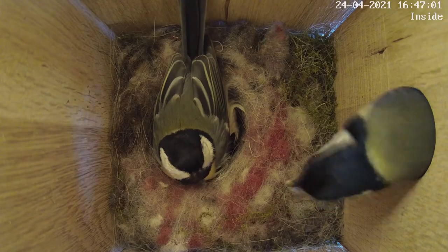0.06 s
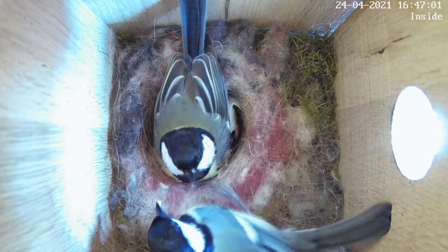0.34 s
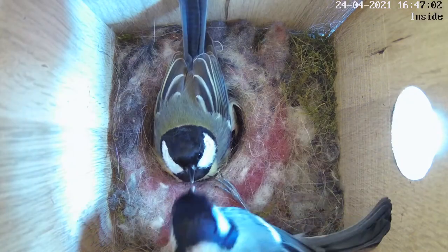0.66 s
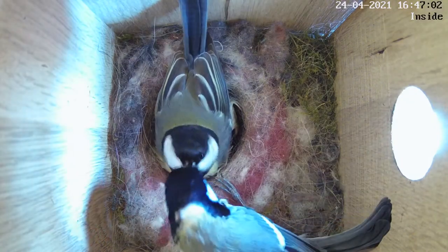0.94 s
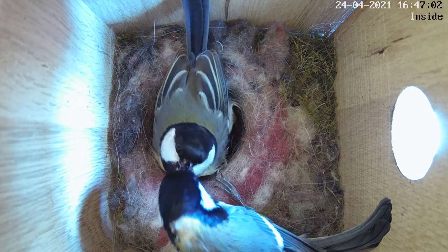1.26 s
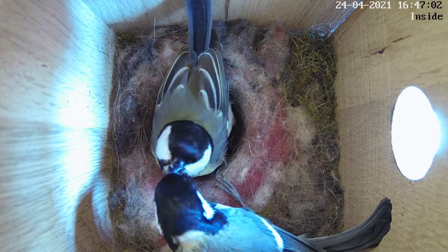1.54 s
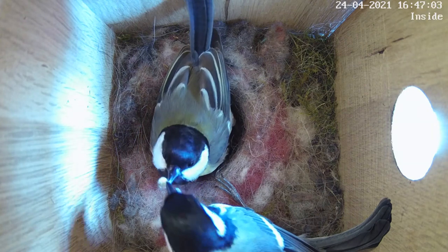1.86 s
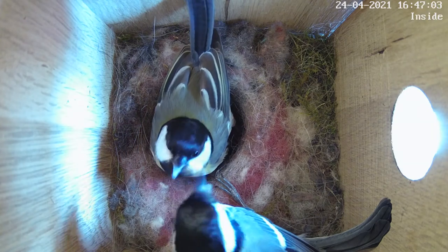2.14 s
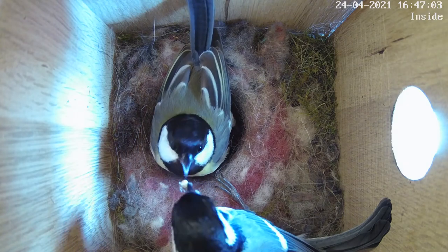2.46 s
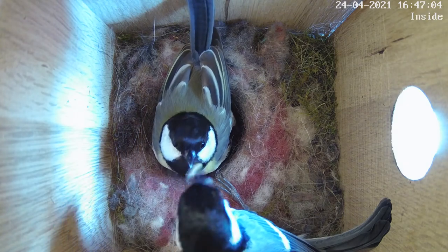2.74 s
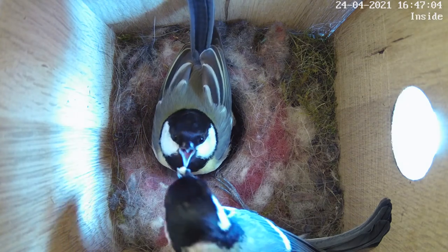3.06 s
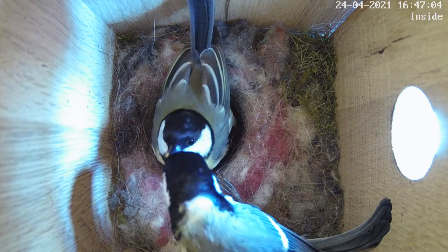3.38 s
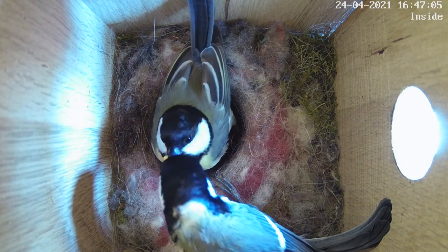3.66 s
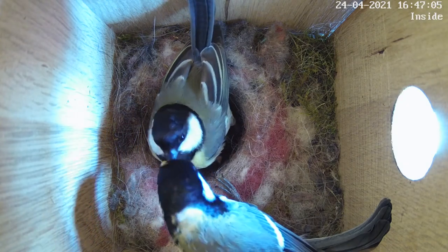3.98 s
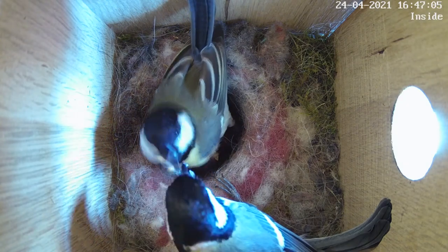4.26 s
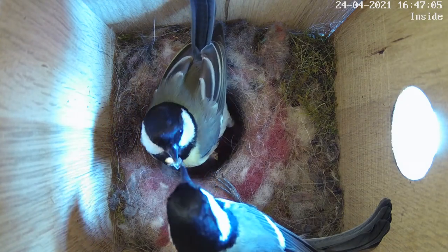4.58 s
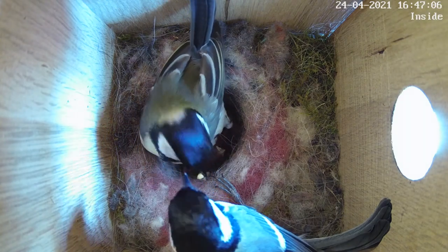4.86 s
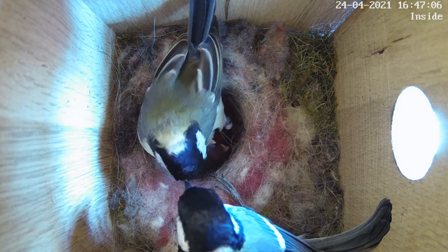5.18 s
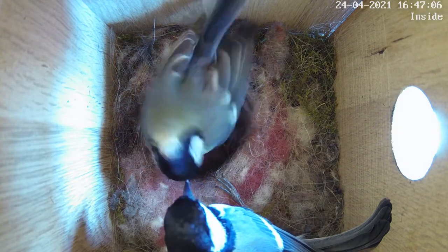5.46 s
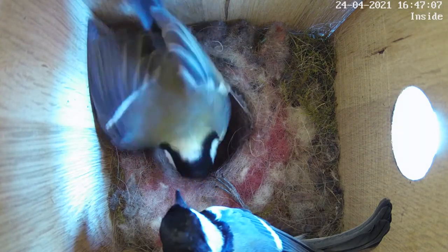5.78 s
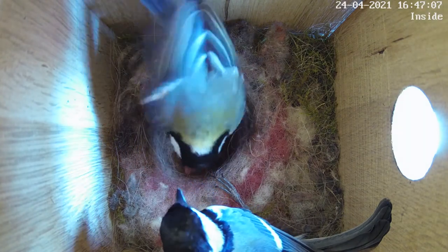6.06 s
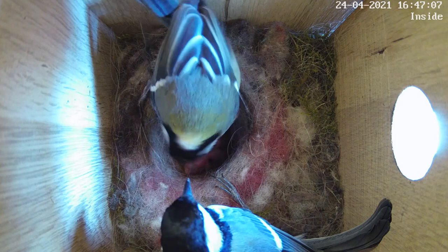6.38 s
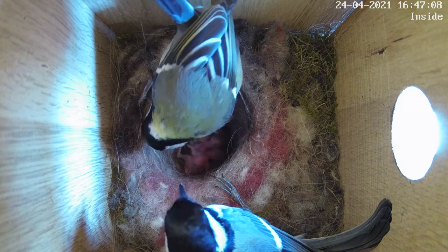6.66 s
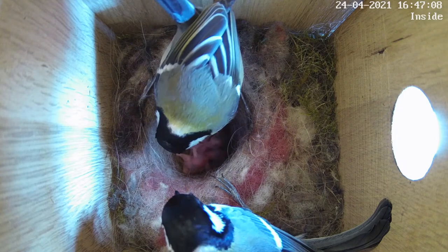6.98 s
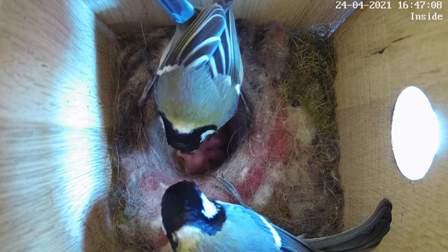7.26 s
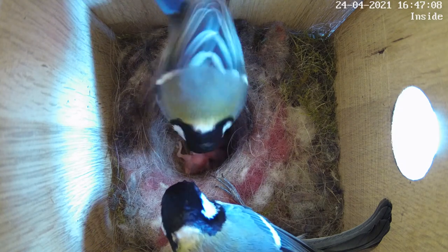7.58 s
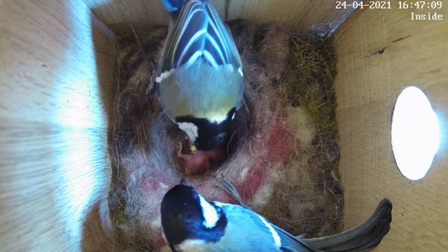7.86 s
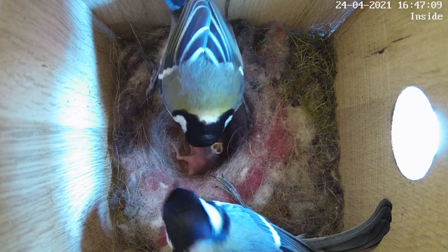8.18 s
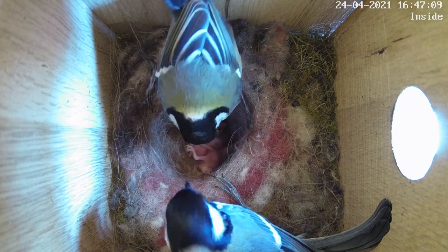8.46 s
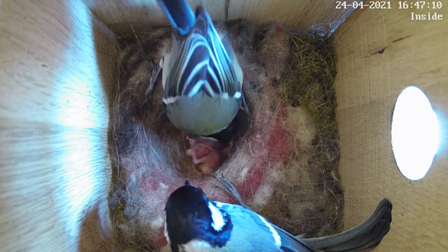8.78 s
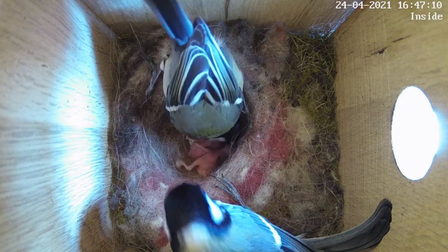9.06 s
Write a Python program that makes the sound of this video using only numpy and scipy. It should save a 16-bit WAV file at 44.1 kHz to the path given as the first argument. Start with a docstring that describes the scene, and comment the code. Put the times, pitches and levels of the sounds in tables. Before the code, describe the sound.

A small microphone is close to two small birds inside a wooden nest box, over a steady low rumble. In the first 0.3 seconds, wings and feet knock hollowly on the walls and the nest rustles. From the start until about 3.3 seconds, one bird gives seven loud, hoarse rasping calls, the later ones surging brighter and the last cracking. Songbirds whistle outside from about 1.2 to 2.7 seconds. Between 3.3 and 5.3 seconds it is quieter, with tiny beak snaps, a faint hatchling peep at 4 seconds and growing rustles of moss and feathers. Sharp double notes come at about 5.6, 6.5 and 7.9 seconds, with a wing thump and a crisp rustle at 5.8. A few more light clicks and shuffles follow. From 7.3 seconds to the end, just past 9, the distant songbirds whistle again with a slight echo, and hatchlings peep thinly near 8.1 and 8.8.

```python
"""Inside a wooden nest box, a small microphone close to two great tits.
One gives long rasping calls, rough syrinx pulses ringing its throat and the box, and later three sharp
double notes. Wings and feet knock the walls, the nest rustles, beaks snap and hatchlings peep faintly.
Farther off, songbirds whistle outside, scattered by trees and walls, over a steady low rumble."""
import sys
import numpy as np
from scipy import signal
from scipy.io import wavfile
from scipy.ndimage import uniform_filter1d

SR = 44100
rng = np.random.default_rng(int(sys.argv[2]) if len(sys.argv) > 2 else 0)


def to_wav(s):
    """Save 16-bit WAV."""
    ch = np.atleast_2d(s).T  # columns
    pcm = np.round(np.clip(ch, -1, 1) * 32767)  # PCM
    wavfile.write(sys.argv[1], SR, pcm.astype(np.int16))


N = 402191
T = np.arange(N) / SR


def amp(db):
    """Decibels to gain."""
    return 10 ** (np.asarray(db) / 20)


def unit_rms(x):
    """Scales to rms 1."""
    return x / np.sqrt(np.mean(x ** 2) + 1e-20)


def add(mix, start, sound):
    """Mixes a sound in at a time in seconds."""
    part = mix[max(round(start * SR), 0):][:len(sound)]
    part += sound[:len(part)]


def wander(count, hz):
    """A random drift of rms 1 that turns hz times a second."""
    knots = rng.standard_normal(N // 8)
    return unit_rms(np.interp(np.arange(count) * hz / SR, np.arange(len(knots)), knots))


def bump(t, centre, half_width):
    """A smooth swell of height 1."""
    return np.exp(-((t - centre) / half_width) ** 2)


def below(x, hz, order):
    """The part of a sound under a frequency."""
    return signal.sosfiltfilt(signal.butter(order, hz, fs=SR, output="sos"), x)


def colour(x, spectrum, peaks=()):
    """Minimum-phase filter made of a broad spectrum plus resonance peaks."""
    bins = np.fft.rfftfreq(4096, 1 / SR)
    corners, db = np.transpose(spectrum)
    power = amp(np.interp(np.log(bins + 1), np.log(corners), db)) ** 2
    for hz, width, peak_db in peaks:
        power += (amp(peak_db) / (1 + ((bins - hz) / (width * .44)) ** 2)) ** 2
    log_gain = np.log(np.r_[power, power[-2:0:-1]]) / 2
    taps = np.fft.ifft(np.exp(np.conj(signal.hilbert(log_gain)))).real
    return signal.oaconvolve(x, taps)[:len(x)]


# The outdoors, heard through the walls: (frequency [Hz], relative level [dB])
RUMBLE_SPECTRUM = [(25, -22.5), (60, -19.5), (85, -19.5), (105, -14), (130, -2.5), (185, 2.5), (240, -1),
                   (310, -11), (450, -22), (600, -24.5), (1100, -24.5), (2500, -37.5), (6000, -47),
                   (15000, -59.5)]
# Its resonances in the box: (frequency [Hz], width [Hz], relative level [dB])
RUMBLE_PEAKS = [(713, 144, -13), (1458, 170, -15.5), (2060, 200, -36), (2930, 590, -32), (10800, 120, -45)]
def rumble(level_db=-44.5, swell_db=.74):
    """A steady low bed of noise, hollow with the box's resonances."""
    gain = amp(level_db + swell_db * wander(N, 5.6))
    return gain * unit_rms(colour(rng.standard_normal(N), RUMBLE_SPECTRUM, RUMBLE_PEAKS))


# Surges within the rasps: (time [s], half width [s], push [dB], hiss rise [dB], clearing [0-1])
EFFORT_SURGES = [(.01, .018, 4.5, 8, 0), (.362, .018, 9, 3.5, .9), (.452, 0.019, 7, 0, .5),
                 (0.502, 0.043, 4, 3.5, 0.14), (0.767, 0.015, 5, 0.5, 0.15), (1.455, 0.019, 7.5, -3.5, 0),
                 (2.217, .03, 7, 12.5, 0.02), (2.343, .025, 12.5, 16, .6), (2.505, .027, 13.5, 16.5, 0.62),
                 (2.641, .026, 15.5, 18.5, 0.7), (2.903, 0.018, 3.5, 0, 0.02), (3.011, .048, 5, 5, 0.61),
                 (3.145, 0.077, 5.5, 12, .8)]
def effort(t, beak_lag=1.6):
    """Surges push the voice and clear its tone; the beak gapes more slowly and lifts the hiss."""
    push_db = sum(db * bump(t, at, width) for at, width, db, _, _ in EFFORT_SURGES)
    gape_db = sum(db * bump(t, at, width * beak_lag) for at, width, _, db, _ in EFFORT_SURGES)
    clearing = sum(share * bump(t, at, width) for at, width, _, _, share in EFFORT_SURGES)
    return push_db, gape_db, clearing


def pulses(cycles, harmonics):
    """One sharp pulse a cycle, as a sum of harmonics."""
    return unit_rms(np.cos(2 * np.pi * np.outer(cycles, np.arange(1, harmonics + 1))).sum(1))


def syrinx(hz, rough):
    """Pulses and puffs of breath; roughness makes their timing and strength chaotic."""
    count = len(hz)
    jitter = .24 * rough ** 2 * wander(count, 600) + .016 * wander(count, 500)
    cycles = np.cumsum(hz * (1 + jitter)) / SR
    shimmer = np.exp((.12 + .25 * rough) * np.clip(wander(count, 400), -1.6, 1.6))
    tone = pulses(cycles, harmonics=24) * shimmer
    tone = signal.sosfilt(signal.butter(1, 1000, "high", fs=SR, output="sos"), tone)  # weak low harmonics
    breath = unit_rms((.4 + np.exp(-(cycles % 1) / .45)) * rng.standard_normal(count))
    return np.sqrt(1 - .75 * rough ** 2) * tone + (.1 + .75 * rough) * breath


# Resonances of throat and box: (frequency [Hz], width [Hz], relative level [dB])
THROAT_PEAKS = [(707.3, 190, 4.5), (1317.5, 123, 1), (1526, 170, 1.5), (1810, 210, -5), (1977, 190, 1),
                (2320, 67, -8.5), (2744, 180, 4.5), (3212, 760, -4.5), (3880, 440, -12.5),
                (4850, 1100, -22.5), (6190, 860, -29), (7660, 1500, -35.5)]
# The broad skirt under them: (frequency [Hz], relative level [dB])
THROAT_SKIRT = [(100, -50.5), (300, -22), (500, -11), (780, -26), (1000, -24.5), (3500, -29), (4400, -35),
                (9000, -44), (10500, -59.5), (13500, -57), (15500, -59.5)]
# The last rasp cracks into hoarse pulses: (time [s])
VOICE_CRACKS = [2.92, 2.974, 3.058, 3.119, 3.205]
# Rasps close to the microphone, before effort acts: (time [s], length [s], attack [s], low band [dB], # throat
# band [dB re low], hiss [dB re low], pitch [Hz], roughness [0-1], beak notch [Hz], lowest resonance [dB])
RASP_CALLS = [(0.0, 0.16, 0.0013, -28.5, -1.5, -20.5, 485, 0.91, 4700, -1.5),
              (.3, 0.532, 0.016, -29.5, -.5, -18, 494.1, .82, 4680, 0.5),
              (.939, 0.22, 0.013, -31, -3, -17.5, 479.7, 0.72, 4660, -1.5),
              (1.294, .183, 0.03, -31, -2.5, -14, 488.4, 0.78, 4240, -1.5),
              (1.752, 0.357, 0.027, -28, -6, -17.5, 455.4, .76, 4020, -1),
              (2.172, 0.51, 0.02, -29, -2.9, -26.5, 475.4, 1.03, 4230, 1),
              (2.879, 0.4, .013, -30, 1, -19.5, 440.9, .55, 4370, -0.5)]
def rasp(start, length, attack, level_db, throat_db, hiss_db, pitch_hz, roughness, notch_hz, chest_db,
         hz_per_db=6, leap_hz=20.78, leap_s=.024, gape_s=.02, shut_db=-4.5, release_s=.024):
    """The syrinx rings the throat and the box; effort makes the call higher, clearer and louder."""
    t = start + np.arange(0, length, 1 / SR)
    push_db, gape_db, clearing = effort(t)
    cracks = sum(bump(t, at, half_width=.011) for at in VOICE_CRACKS)
    leaps = sum(bump(t, at + leap_s, leap_s) for at in VOICE_CRACKS)  # the pitch leaps after a crack
    hz = pitch_hz + hz_per_db * push_db + leap_hz * leaps
    rough = np.clip(roughness * (1 - clearing) + .66 * cracks, 0, 1)
    voice = colour(syrinx(hz, rough), THROAT_SKIRT, THROAT_PEAKS)
    notched = signal.lfilter(*signal.iirnotch(notch_hz, Q=4.1, fs=SR), voice)
    voice += .82 * (notched - voice)  # the beak's anti-resonance
    voice += (amp(chest_db + 2.5 * cracks) - 1) * below(voice, 1013, order=6)  # the lowest resonance
    low = below(voice, 2450, order=8)
    under_notch = below(voice, notch_hz, order=8)
    hiss = voice - under_notch
    throat = under_notch - low
    throat += (amp(.45 * push_db) - 1) * below(throat, 3050, order=8)  # surges favour its main resonance
    shut = np.maximum(1 - np.minimum(t - start, t[-1] - t) / gape_s, 0)  # the beak opens and closes
    # Each band is levelled, then set: more effort and a wider beak move the power upwards.
    bands = ((low, .09 * push_db), (throat, throat_db + push_db),
             (hiss, hiss_db + gape_db + shut_db * shut))
    call = sum(amp(db) * band / np.sqrt(abs(uniform_filter1d(band ** 2, size=1200)) + 1e-12)
               for band, db in bands)
    envelope = np.clip(np.minimum((t - start) / attack, (t[-1] - t) / release_s), 0, 1)
    waver_db = .83 * wander(len(t), 33.8)
    return amp(level_db + waver_db) * call * envelope


# Modes of the wooden box: (frequency [Hz], relative level [dB], time to fall 60 dB [s])
BOX_MODES = [(153, -29, 0.18), (198, -5, 0.17), (293, 8.5, 0.016), (412, 15.5, 0.0087), (687, 9.5, 0.1),
             (830, 0, 0.12), (1510, -30, .035), (2000, -28, .025), (2800, -12, 0.0092)]
# Scraping of feathers, claws and nest: (frequency [Hz], relative level [dB])
SCRAPE_SPECTRUM = [(150, -19.5), (400, -3.5), (600, 0.5), (1100, -4.5), (1700, -2), (2450, -5.5),
                   (3000, -7), (4500, -19), (8000, -32.5), (15000, -38.5)]
# Wings and feet hit the walls around the microphone: (time [s], thud peak [dB], contact [s])
WALL_KNOCKS = [(.002, -16.5, 0.0072), (.027, -18.5, 0.0064), (0.061, -21.5, .0055), (0.124, -18, 0.0053),
               (.148, -18.5, 0.0047), (0.169, -13.5, .005), (0.194, -13.5, 0.0046), (0.209, -20, 0.0052),
               (.277, -29, 0.0014), (2.809, -31.5, 0.0014), (2.823, -34.5, 0.0009), (3.944, -40.5, .0014),
               (5.087, -36, 0.00095), (5.331, -39, 0.00096), (5.454, -30, 0.00085), (5.492, -33, 0.0011),
               (5.548, -37, .0012), (5.7511, -12, 0.0024), (5.781, -27, 0.0019), (5.81, -28, 0.0052),
               (5.822, -39, .0007), (6.038, -43.5, 0.0015)]
def knock(peak_db, contact, scrape_db=-19):
    """A soft push rings the box while feathers or claws scrape."""
    t = T[:SR // 5]
    ring = sum(amp(db - 60 * t / t60) * np.sin(2 * np.pi * hz * t) for hz, db, t60 in BOX_MODES)
    push = np.sin(np.linspace(0, 2 * np.pi, int(contact * SR) + 3))  # in, and back out
    thud = signal.oaconvolve(ring, push)[:len(t)]
    age = t / (.96 * contact)
    scrape = unit_rms(colour(rng.standard_normal(len(t)), SCRAPE_SPECTRUM)) * age * np.exp(1 - age)
    return amp(peak_db) * (thud / abs(thud).max() + amp(scrape_db) * scrape)


# The box rings under scratches: (frequency [Hz], width [Hz], relative level [dB])
WALL_PEAKS = [(694, 300, 9.5), (1320, 240, 0.5), (1990, 200, 4.5)]
# Shuffles in the nest, close by: (time of peak [s], half width [s], level [dB], crispness [0-1])
NEST_SHUFFLES = [(.18, 0.12, -42, 1), (3.38, .08, -55, 0.5), (4.86, 0.12, -49, 0.25),
                 (5.13, 0.11, -51.5, 0.22), (5.45, 0.099, -46.5, 0.67), (5.555, 0.026, -44.5, 0.72),
                 (5.787, 0.011, -24, .95), (5.83, 0.13, -50, .9), (6.1, 0.02, -45.5, 0.98),
                 (6.22, 0.12, -55, 0.5), (7.62, 0.2, -56, .9)]
def rustle(grains_per_s=700, spread_db=4.5, clump_db=3.5, fidget_db=-63):
    """Moss and hair crackle and feathers rub in short scratches, faintly even between shuffles."""
    grains = (rng.random(N) < grains_per_s / SR) * rng.choice([-1, 1], N)
    grains = grains * amp(spread_db * np.minimum(rng.exponential(1, N), 3))
    rub = .87 * rng.standard_normal(N)
    scratches = (unit_rms(grains) + rub) * amp(clump_db * np.clip(wander(N, 70), -2, 2))
    sound = unit_rms(colour(scratches, SCRAPE_SPECTRUM, WALL_PEAKS))
    soft = below(sound, 1000, order=4)  # feathers on wool; dry moss crackles above
    swells = [(amp(db) * bump(T, at, width), crisp) for at, width, db, crisp in NEST_SHUFFLES]
    soft_gain = np.sqrt(amp(fidget_db) ** 2 + sum(swell ** 2 for swell, _ in swells))
    crackle_gain = np.sqrt(amp(fidget_db) ** 2 + sum((swell * crisp) ** 2 for swell, crisp in swells))
    return soft * soft_gain + (sound - soft) * crackle_gain


# Colour of a snap: (frequency [Hz], relative level [dB])
SNAP_SPECTRUM = [(500, -39), (2200, -1), (2900, 18), (3900, 8), (4400, -2), (5300, -4), (8000, -17),
                 (15000, -29)]
# Beak snaps at close range: (time [s], peak before a 2 dB lift [dB])
BEAK_SNAPS = [(0.8632, -51), (1.1585, -58), (3.3604, -53), (3.4436, -48), (3.5717, -52), (4.4463, -46.5),
              (4.551, -44), (4.569, -47), (4.6204, -53), (4.6955, -40), (4.7574, -53), (4.839, -46.5),
              (4.9866, -49.5), (5.1307, -53.5), (5.3074, -47), (6.187, -51), (6.265, -57), (7.577, -50.5),
              (7.6296, -51)]
def beak_snap(db, decay_s=.0013, echo_s=.0053):
    """A beak snaps on food: a tiny crack with quick wall echoes."""
    t = T[:SR // 25]
    envelope = np.exp(-t / decay_s) + .36 * np.exp(-t / echo_s)
    crack = colour(rng.standard_normal(len(t)) * envelope, SNAP_SPECTRUM)
    return amp(db + 2) * crack / abs(crack).max()


def whistles(rows, waver):
    """Near-pure glides through three pitches; steep ones are burry."""
    track = np.zeros(N)
    for start, length, first, middle, last, db in rows:
        progress = np.linspace(0, 1, int(length * SR))
        glide = np.polyval(np.polyfit([0, .5, 1], [first, middle, last], 2), progress)
        burr = waver * (1 + 9 * abs(np.log(first / last)))
        hz = glide * (1 + burr * wander(len(glide), 220))
        tone = np.sqrt(2) * np.sin(2 * np.pi * np.cumsum(hz) / SR)
        add(track, start, amp(db) * tone * signal.windows.tukey(len(tone), .4))
    return track


# Songbirds farther off, outside the box:
# (time [s], length [s], first pitch [Hz], middle pitch [Hz], last pitch [Hz], level before echoes [dB])
OUTDOOR_SONG = [(1.18, 0.12, 2250, 1900, 1840, -51.5), (1.46, 0.042, 2053, 1970, 2160, -37.5),
                (1.635, 0.14, 3076, 2655, 2100, -48), (2.085, .07, 1967, 2016, 2056, -39.5),
                (2.25, 0.16, 2100, 2234, 2440, -41), (2.55, 0.2, 2426, 2428, 2452, -54),
                (3.39, 0.036, 4840, 5180, 5150, -71), (3.43, 0.039, 3780, 3880, 4100, -65),
                (3.675, 0.037, 4430, 4650, 4570, -71.5), (3.72, 0.026, 3600, 3870, 4070, -64),
                (7.32, 0.12, 1470, 1650, 1825, -52), (7.54, 0.05, 1980, 1980, 1974, -42),
                (7.62, 0.1, 1850, 1890, 1984, -44.5), (7.76, 0.25, 2312, 2035, 2000, -42),
                (8.03, 0.072, 2740, 2300, 2290, -45.5), (8.24, 0.051, 2670, 3020, 3060, -54.5),
                (8.27, 0.2, 2027, 2390, 2370, -42.5), (8.47, 0.085, 2236, 2180, 2052, -39.5),
                (8.5, 0.076, 2620, 2860, 2860, -56.5), (8.71, 0.061, 3870, 3040, 2780, -55),
                (9.07, 0.19, 1950, 1900, 2015, -50.5)]
def songbirds(t60=.97, echoes_per_s=2000):
    """Whistled song, scattered into a tail by trees and walls."""
    song = whistles(OUTDOOR_SONG, waver=.0089)
    t = T[:SR]
    echoes = rng.standard_normal(SR) * (rng.random(SR) < echoes_per_s / SR)
    tail = echoes * (amp(-60 * t / t60) + 2 * np.exp(-t / .016))
    return .86 * song + .97 * signal.oaconvolve(song, tail / np.linalg.norm(tail))[:N]


# Hatchlings in the nest, near but faint:
# (time [s], length [s], first pitch [Hz], middle pitch [Hz], last pitch [Hz], level [dB])
HATCHLING_PEEPS = [(4.003, .045, 4350, 4220, 3700, -55), (5.975, .045, 4300, 4230, 3600, -72),
                   (8.069, 0.023, 4460, 5450, 5370, -59), (8.09, 0.035, 5760, 5100, 4400, -57),
                   (8.796, 0.034, 5100, 5760, 5150, -62.5)]
def hatchlings():
    """Thin, high peeps that reach the microphone directly."""
    return whistles(HATCHLING_PEEPS, waver=.0012)


# Colour of the voice with the beak wide open: (frequency [Hz], relative level [dB])
OPEN_BEAK_SPECTRUM = [(300, -45.5), (700, -9.5), (1050, -17.5), (1450, 2), (1650, -11), (2000, -5),
                      (2550, -11), (3150, 0), (3850, 5), (4600, -14), (5400, -13.5), (7500, -28),
                      (10000, -49), (15000, -50)]
# The box rings on after a note: (frequency [Hz], width [Hz], relative level [dB])
NOTE_PEAKS = [(1600, 85, -13.5), (2040, 160, -2.5)]
# Pairs of sharp notes, close to the microphone:
# (time [s], length [s], top pitch [Hz], level before a 7 dB cut [dB], roughness [0-1], brightness [dB])
SHARP_NOTES = [(5.625, 0.03, 1500, -13.5, 0.23, 2), (5.653, 0.04, 1605, -13, 0.36, 2),
               (6.521, 0.032, 1560, -13, 0.45, 6), (6.5614, 0.038, 1592, -13, 0.65, 2.5),
               (7.8664, 0.039, 1536, -13.5, 0.22, -1), (7.9173, 0.039, 1582, -14.5, 0.45, 0)]
def sharp_note(length, top_hz, db, roughness, bright_db, arch_share=.15):
    """A short pitch arch: it starts hoarse, clears in the middle and ends on its fundamental."""
    progress = np.linspace(0, 1, int(length * SR))
    count = len(progress)
    arch = np.sin(np.pi * progress)
    rough = np.clip(roughness * (1 + 1.5 * np.cos(np.pi * progress / 1.3) ** 2), 0, .95)
    hz = top_hz * (1 - arch_share * (1 - arch)) * (1 + .06 * rough * wander(count, 1200))
    cycles = np.cumsum(hz) / SR
    # Strong and weak pulses alternate, adding tones halfway between the harmonics.
    tone = pulses(cycles, harmonics=6) * (1 + .35 * np.cos(5 * np.pi * cycles))
    air = rng.standard_normal(count)
    voice = (np.sqrt(1 - rough ** 2) * tone + rough * air) * arch ** 2
    scratch = .34 * (1 - progress) * air
    hum = .3 * progress * np.cos(2 * np.pi * cycles)
    voice += (scratch + hum) * signal.windows.tukey(count, .15)
    sound = colour(np.pad(voice, (0, 900)), OPEN_BEAK_SPECTRUM, NOTE_PEAKS)
    dark = below(sound, 5000, order=4)
    return amp(db - 7) * unit_rms(dark + amp(bright_db) * (sound - dark))


def scene(rebound_s=.007, rebound_db=-6):
    """Everything as it arrives at the microphone inside the box, in mono."""
    mix = rumble() + rustle() + hatchlings() + songbirds()
    for start, *settings in RASP_CALLS:
        add(mix, start, rasp(start, *settings))
    for source, table in ((sharp_note, SHARP_NOTES), (knock, WALL_KNOCKS), (beak_snap, BEAK_SNAPS)):
        for start, *settings in table:
            add(mix, start, source(*settings))
    for start, db in BEAK_SNAPS:  # a weaker click follows each snap
        add(mix, start + rebound_s, beak_snap(db + rebound_db))
    return mix[None]


def record(dry, bass_cut_hz=120, treble_cut_hz=15700):
    """The small microphone has no deep bass, and the recorder cuts the highest treble."""
    thin = signal.sosfilt(signal.butter(6, bass_cut_hz, "high", fs=SR, output="sos"), dry)
    band_limit = signal.firwin(511, treble_cut_hz, window=("kaiser", 9), fs=SR)
    return signal.oaconvolve(thin, band_limit[None], "same")


dry = scene()
out = record(dry)
to_wav(out)
```